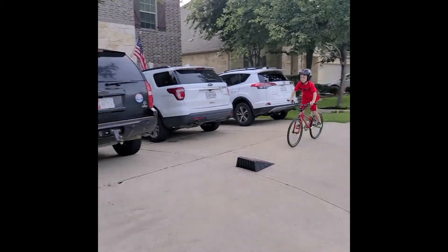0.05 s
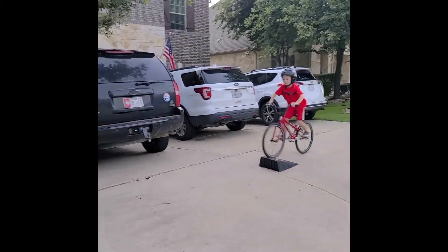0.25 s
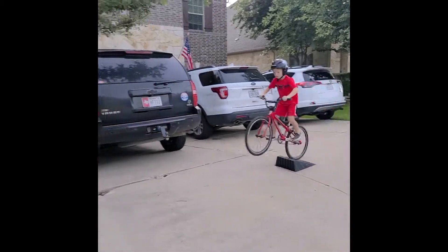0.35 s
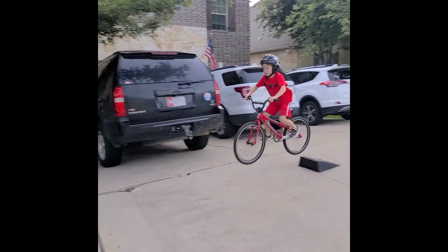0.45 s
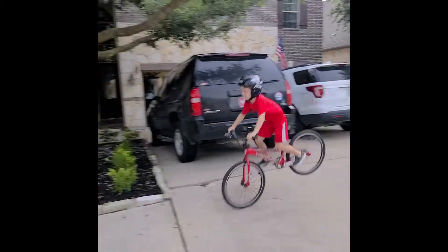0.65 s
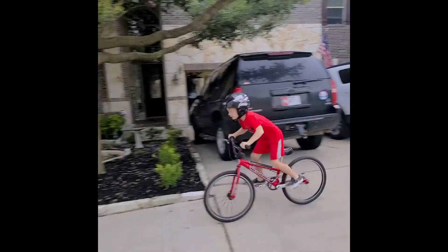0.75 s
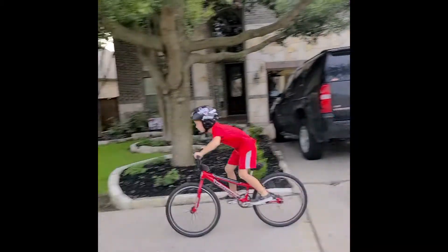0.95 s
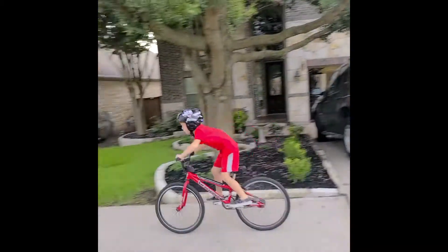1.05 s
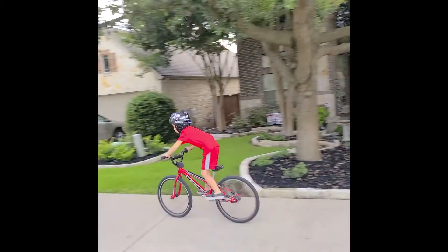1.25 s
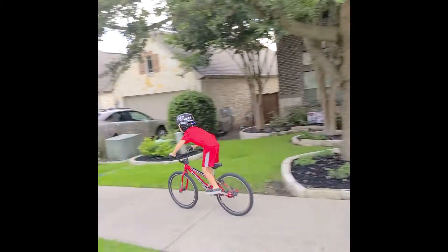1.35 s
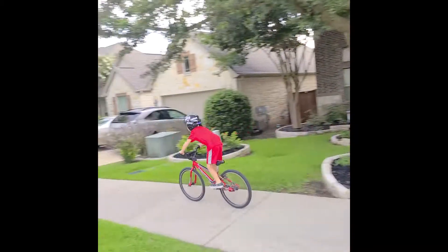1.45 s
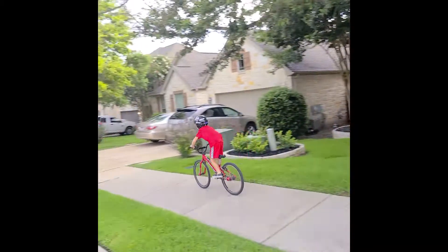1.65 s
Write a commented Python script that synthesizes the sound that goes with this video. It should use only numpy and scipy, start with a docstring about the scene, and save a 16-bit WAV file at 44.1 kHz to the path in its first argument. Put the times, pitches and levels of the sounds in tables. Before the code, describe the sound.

A bike jumps a plastic ramp with two clattering thumps, then lands with a chain slap.

```python
"""Bicycle over a plastic ramp

A child coasts over a small ramp on a quiet driveway. Each wheel thumps the hollow plastic and slaps
it on the concrete. After a short flight the tyres land with a low boom, a gritty scrub and a chain
slap, and the bike rolls off with its freewheel ticking."""
import sys
import numpy as np
from scipy import signal
from scipy.fft import rfft, irfft
from scipy.io import wavfile
from scipy.ndimage import uniform_filter1d

SR = 44100
rng = np.random.default_rng(int(sys.argv[2]) if len(sys.argv) > 2 else 0)


def persist_wave(psi):
    """Save psi, clipped to +-1, as 16-bit WAV."""
    counts = np.round(np.clip(psi, -1, 1) * 32767).astype(np.int16)
    wavfile.write(sys.argv[1], SR, np.atleast_2d(counts).T)


N = 74970
TIME, FREQS = np.arange(N) / SR, np.fft.rfftfreq(N, 1 / SR)


def amp(db):
    """Decibels to gain."""
    return 10 ** (np.asarray(db) / 20)


def unit(x):
    """Scale to unit rms."""
    return x / np.sqrt(np.mean(x ** 2) + 1e-20)


def read(points, hz):
    """Interpolate a table on a log-frequency axis."""
    table_hz, value = np.transpose(points)
    return np.interp(np.log(hz + 1), np.log(table_hz + 1), value)


def decay(start_s, t60_s, rise_s=.0003):
    """Linear rise, exponential fall."""
    age_s = np.maximum(TIME - start_s, 0)
    return np.minimum(age_s / rise_s, 1) * np.exp(-np.log(1000) * age_s / t60_s)


def drift(span_s):
    """Random wander, unit rms."""
    size = max(int(span_s * SR), 1)
    smoothed = uniform_filter1d(rng.standard_normal(N), size, mode="wrap")
    return unit(uniform_filter1d(smoothed, size, mode="wrap"))


def pair(gain):
    """Coloured noise at two microphones: alike in the bass, unlike in the treble."""
    # Each row: frequency in Hz, left-right correlation before clipping.
    likeness = [(30, 3), (150, .97), (300, 0.87), (650, 0.76), (1000, 0.63), (1600, 0), (2500, 0.64),
                (3800, -0.16), (16000, 0)]
    correlation = np.clip(read(likeness, FREQS), -1, 1)
    a, b = rfft(rng.standard_normal((2, N)))
    mid, side = a * np.sqrt(1 + correlation), b * np.sqrt(1 - correlation)
    return unit(irfft(np.array([mid + side, mid - side]) * gain, N))


def noise(spectrum):
    """Unit-rms stereo noise shaped by rows of Hz, relative dB."""
    return pair(amp(read(spectrum, FREQS)))


def snap(start_s, push_s=.00044, gain_db=11):
    """Pressure spike of a hard contact: quick push, shallow pull."""
    u = 2 * np.maximum(TIME - start_s, 0) / push_s
    return amp(gain_db) * u * (2 - u) * np.exp(-u)


def air(level_db=-40, swell_db=.8):
    """Low air rumble and neighbourhood hiss, gently swelling."""
    # Each row: frequency in Hz, relative density in dB.
    spectrum = [(15, -48), (30, -37), (55, 6), (80, -1), (120, -4.5), (170, -15), (300, -25), (800, -32),
                (2000, -32), (4500, -43.5), (7000, -39.5), (9500, -58.5), (16000, -67)]
    return amp(level_db + swell_db * drift(span_s=.05)) * noise(spectrum)


def rolling():
    """Tread hisses on the concrete and all but stops in flight."""
    # Each row: time in seconds, level in dB.
    levels = [(0, -51), (0.19, -50), (0.33, -46), (0.42, -99), (0.63, -61), (0.7, -31.5), (0.85, -40.5),
              (1.0, -51.5), (1.3, -55.5), (1.7, -55.5)]
    # Each row: frequency in Hz, relative density in dB.
    spectrum = [(60, 3.5), (250, 5.5), (450, -6.5), (800, 4.5), (1400, -5), (2200, -4.5), (3000, -5.5),
                (4500, -11), (7000, -18), (9500, -24), (16000, -33)]
    return amp(np.interp(TIME, *np.transpose(levels))) * noise(spectrum)


def chain(clash_db=1.0):
    """The chain slaps the frame; its links clash in short clusters."""
    # Each row: start in seconds, level in dB, t60 in seconds.
    hits = [(0.153, -47, .05), (0.2, -34.5, 0.072), (0.68, -28, 0.042), (0.7429, -14, 0.03),
            (0.748, -23, 0.087), (0.783, -32, 0.078), (0.8, -30.5, 0.14), (0.826, -31, 0.07),
            (0.915, -43.5, 0.19), (1.174, -43.5, 0.11), (1.606, -42.5, 0.1), (1.6286, -43, 0.037)]
    # Each row: frequency in Hz, relative density in dB.
    spectrum = [(100, -12), (260, -1.5), (450, -8), (950, -2), (1450, -9.5), (2000, -3), (2800, -1.5),
                (3400, -9.5), (3900, -6.5), (5000, -19), (7000, -10.5), (9500, -28), (16000, -27)]
    power = sum((amp(db) * decay(start_s, t60_s)) ** 2 for start_s, db, t60_s in hits)
    snaps = sum(amp(db) * snap(start_s) for start_s, db, _ in hits)
    links = unit(noise(spectrum) * amp(clash_db * drift(span_s=.003)))
    return np.sqrt(power) * links - snaps


def ramp(thud_hz=183.6, thud_s=.013, thud_delay_s=.0031):
    """Each tyre thuds into the hollow ramp, which rocks, slaps the concrete and bottoms out."""
    # Tyre meets lip. Each row: start in seconds, thud in dB, scuff in dB.
    touches = [(0.208, -8, -16.5), (0.332, -8, -18.5)]
    # Each row: start in seconds, ring in dB, clatter in dB, crack in dB, clatter t60 in seconds.
    blows = [(0.198, -45, -36, -28, 0.046), (0.2191, -17, -7.5, -9.5, 0.03),
             (0.225, -6, -14.5, -22.5, 0.15), (0.308, -29.5, -37, -60, 0.26),
             (0.3438, -13, -12, -14, 0.082), (0.3526, -9, -19.5, -32, 0.071)]
    # Each row: frequency in Hz, level in dB relative to the ring, t60 in seconds.
    modes = [(126.5, -15.5, .2), (160, -13.5, 0.091), (264.4, 4.5, 0.11), (317.6, -7, 0.078),
             (382, -17, 0.2), (568.6, -8.5, 0.083), (736, -5.5, 0.067), (823, -22.5, 0.076),
             (1048, -11.5, 0.052), (1430, -17.5, 0.041), (1535, -28.5, 0.047), (1750, -23, 0.086),
             (1952, -14, 0.046), (2514, -15.5, 0.058)]
    # Plastic clatter, crack on concrete. Each row: frequency in Hz, relative density in dB.
    clatter_spectrum = [(60, -5), (200, 4), (450, -2), (650, -0.5), (1050, -3.5), (1600, -8), (2600, -10),
                        (3300, -16.5), (4100, -23), (7000, -26), (8500, -33), (16000, -44.5)]
    crack_spectrum = [(200, 14), (1000, 1.5), (2600, 7.5), (4000, -31), (4700, -11), (7000, 7.5),
                      (8300, -36), (16000, -44)]
    clatter, crack = noise(clatter_spectrum), noise(crack_spectrum)
    out = np.zeros((2, N))
    clatter_power = np.zeros(N)
    for start_s, thud_db, scuff_db in touches:
        age_s = TIME - start_s - thud_delay_s
        push = np.sin(np.pi * np.clip(age_s / thud_s, 0, 1))
        out += amp(thud_db) * push * np.sin(2 * np.pi * thud_hz * age_s)
        clatter_power += (amp(scuff_db) * decay(start_s, t60_s=.13, rise_s=.0018)) ** 2
    for start_s, ring_db, clatter_db, crack_db, clatter_t60_s in blows:
        for k, (hz, db, t60_s) in enumerate(modes):
            ring = decay(start_s, t60_s) * np.sin(2 * np.pi * hz * (TIME - start_s))
            out += (-1) ** k * amp(ring_db + db) * ring
        clatter_power += (amp(clatter_db) * decay(start_s, clatter_t60_s)) ** 2
        out += amp(crack_db) * (snap(start_s) + decay(start_s, t60_s=.01) * crack)
    return out + np.sqrt(clatter_power) * clatter


def buzzes():
    """Loose parts chatter briefly, each in one resonance."""
    # Each row: start in seconds, length in seconds, centre in Hz, half width in Hz, level in dB.
    bursts = [(0.311, 0.021, 2506, 74, -36.5), (0.677, 0.025, 2224, 130, -34),
              (0.785, 0.041, 214, 21, -37.5), (1.239, 0.015, 2980, 130, -52.5),
              (1.352, 0.012, 7650, 100, -47), (1.504, 0.047, 1760, 270, -49),
              (1.606, 0.014, 1670, 120, -43.5), (1.694, .014, 2860, 160, -45.5)]
    out = np.zeros((2, N))
    for start_s, length_s, hz, half_width_hz, db in bursts:
        progress = np.clip((TIME - start_s) / length_s, 0, 1)
        swell = np.sqrt(np.abs(np.sin(np.pi * progress)))
        resonance = 1 / (1 + ((FREQS - hz) / half_width_hz) ** 2)
        out += amp(db) * swell * pair(resonance)
    return out


def landing(boom_hz=56.7, boom_rise_s=.011, grit_db=1.2):
    """The tyres squash on the concrete with a low boom and scrub over grit."""
    # Each row: start in seconds, boom in dB, scrub in dB, scrub t60 in seconds.
    touchdowns = [(0.652, -23, -30.5, .4), (0.7221, -16.5, -27, 0.51)]
    # Each row: frequency in Hz, relative density in dB.
    scrub_spectrum = [(60, -5), (200, -6), (450, -20), (950, -4.5), (1450, -11), (2500, -7), (3400, -20),
                      (5200, -16.5), (7000, -15), (9500, -30), (12500, -21), (16000, -29)]
    out = np.zeros((2, N))
    for start_s, boom_db, scrub_db, t60_s in touchdowns:
        age_s = np.maximum(TIME - start_s, 0)
        squash = age_s / boom_rise_s * np.exp(1 - age_s / boom_rise_s)
        out -= amp(boom_db) * squash * np.cos(2 * np.pi * boom_hz * age_s)
        scrub = unit(noise(scrub_spectrum) * amp(grit_db * drift(span_s=.0019)))
        out += amp(scrub_db) * decay(start_s, t60_s, rise_s=.0035) * scrub
    return out


def freewheel(start_s=.8555, rate_hz=48.7, climb_hz_per_s=12, closest_s=.95, near_s=.35):
    """Pawls tick faster as the bike rolls downhill; spinning wheels fizz. Both fade with distance."""
    # Each row: frequency in Hz, relative density in dB.
    tick_spectrum = [(500, -24), (2500, -1), (5000, 3), (7500, 12), (9500, -1), (12500, 6), (16000, -13)]
    fizz_spectrum = [(1000, -21), (4000, 2), (7000, 4), (9500, 0.5), (13000, -2.5), (16000, -2)]
    tick_db, spread_db, fizz_db = -49, 2.2, -56  # at closest approach
    age_s = np.maximum(TIME - start_s, 0)
    teeth = np.ceil(rate_hz * age_s + .5 * climb_hz_per_s * age_s ** 2)
    onsets_s = TIME[1:][np.diff(teeth) > 0]
    gains = amp(spread_db * rng.standard_normal(len(onsets_s)))
    envelope = sum(gain * decay(onset_s, t60_s=.022) for onset_s, gain in zip(onsets_s, gains))
    ticks = amp(tick_db) * envelope * noise(tick_spectrum)
    fizz = amp(fizz_db) * noise(fizz_spectrum)
    relative_distance = np.hypot(1, (TIME - closest_s) / near_s)
    return (ticks + fizz) / relative_distance


def yard(x, gap_s=.0097, build_s=.031):
    """A few reflections and a thin diffuse tail from cars and house fronts."""
    # Each row: frequency in Hz, tail gain in dB.
    colour = [(60, -3.5), (120, -13.5), (190, -2.5), (250, -21.5), (285, -33), (345, -8.5), (480, -24.5),
              (900, -15), (2500, -17), (7000, -13), (16000, -1)]
    # Each row: frequency in Hz, t60 in seconds.
    decay_times = [(120, 0.63), (320, 0.74), (900, 0.91), (2500, 0.33), (8000, .4)]
    # Each row: delay in seconds, gain in dB.
    reflections = [(.021, -38), (.034, -27.5), (.058, -37)]
    hz, age_s, frames = signal.stft(pair(1), SR, nperseg=512)
    t60_s = read(decay_times, hz)[:, None]
    fall = np.exp(-np.log(1000) * age_s / t60_s)
    fall *= np.sqrt(2 * np.log(1000) / (t60_s * SR))  # unit energy
    frames *= fall * amp(read(colour, hz))[:, None]
    response = signal.istft(frames, SR, nperseg=512)[1][:, :N]
    response *= np.clip((TIME - gap_s) / build_s, 0, 1)
    for delay_s, db in reflections:
        response[:, round(delay_s * SR)] += amp(db)
    return signal.fftconvolve(x, response, axes=1)[:, :N]


def scene():
    """The bike and its yard echo, over tread hiss and outdoor air."""
    bike = ramp() + landing() + chain() + buzzes() + freewheel()
    return bike + yard(bike) + rolling() + air()


def record(dry, cutoff_hz=15850):
    """Microphone pair leaning right, most in the upper mids; clip at full scale, then low-pass."""
    # Each row: frequency in Hz, left minus right in dB.
    balance = [(60, -3.5), (250, -1.5), (500, -1), (1000, 0), (2000, -5), (4000, -4.5), (8000, -1.5),
               (15000, 0.5)]
    tilt = amp(np.outer([.5, -.5], read(balance, FREQS)))
    heard = np.clip(irfft(rfft(dry) * tilt, N), -1, 1)
    lowpass = signal.firwin(511, cutoff_hz, window=("kaiser", 9), fs=SR)
    return signal.oaconvolve(heard, lowpass[None], "same")


dry = scene()
out = record(dry)
persist_wave(out)
```